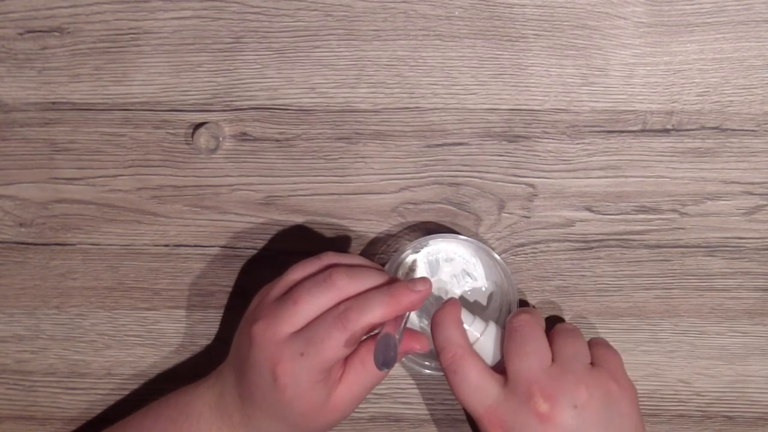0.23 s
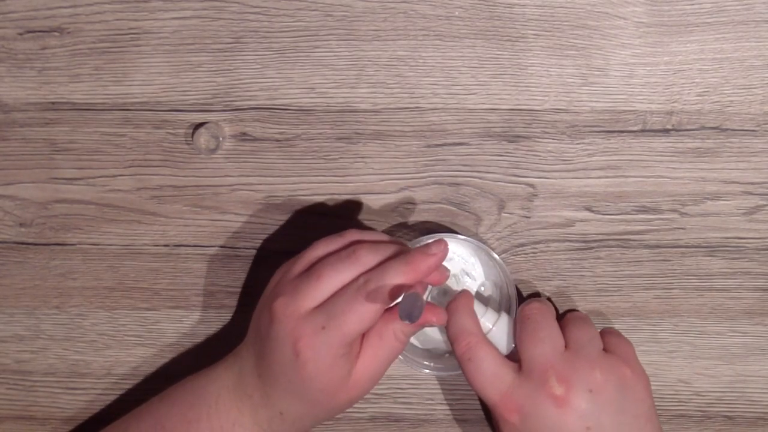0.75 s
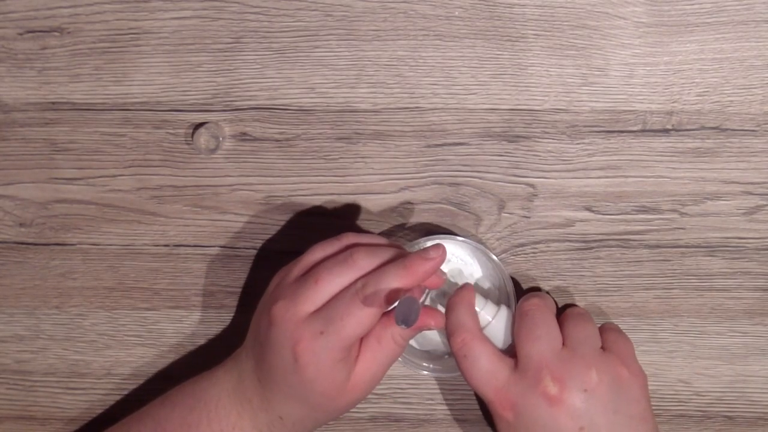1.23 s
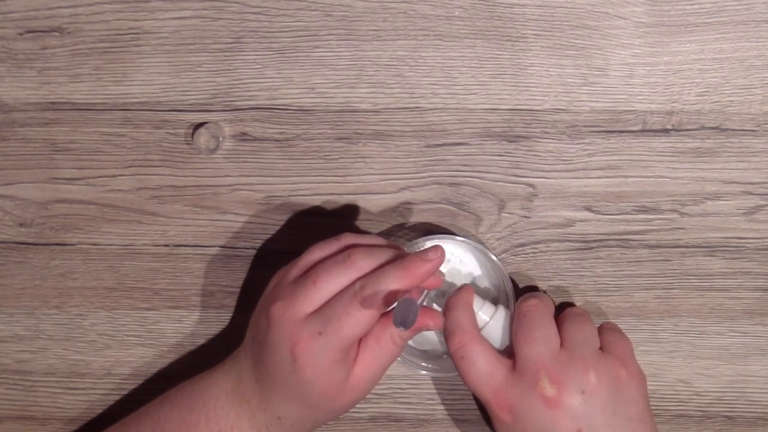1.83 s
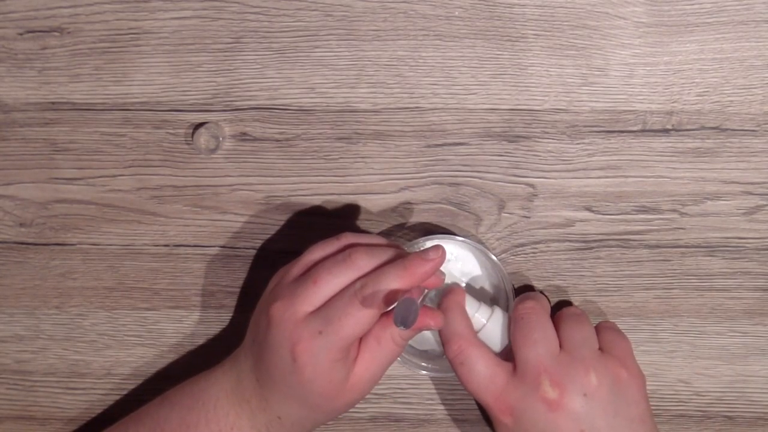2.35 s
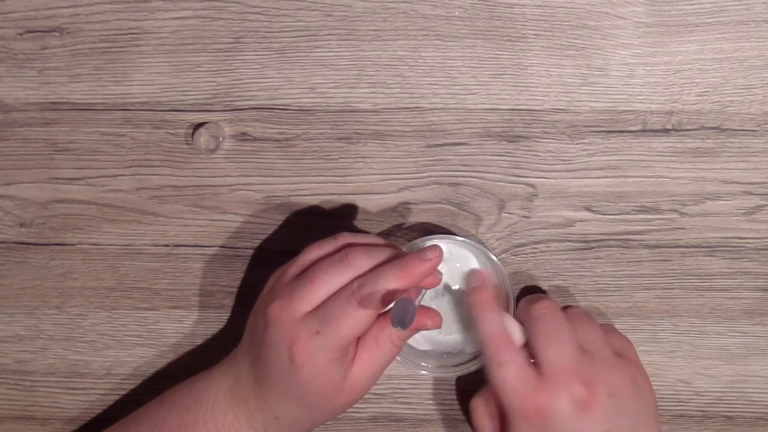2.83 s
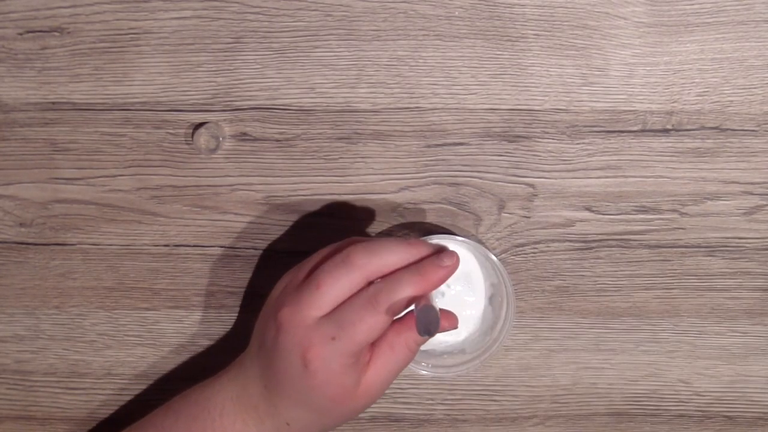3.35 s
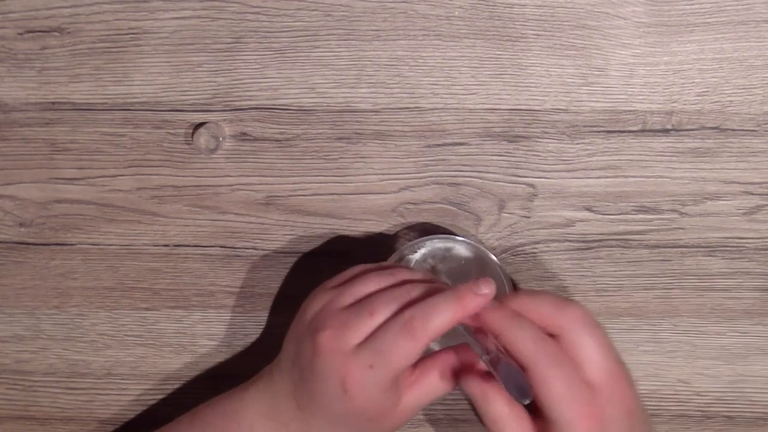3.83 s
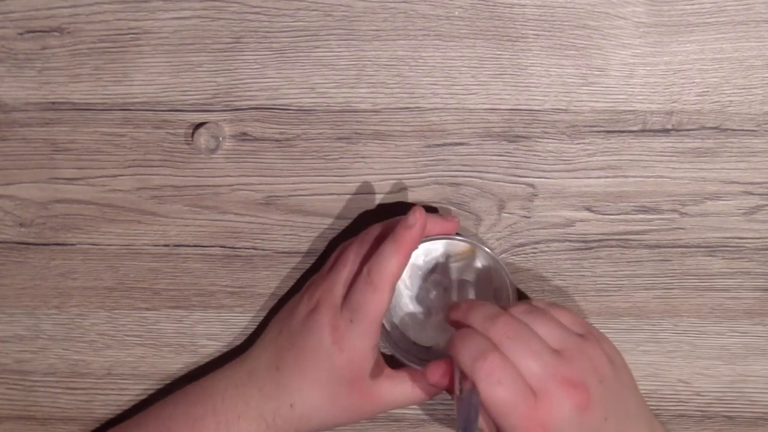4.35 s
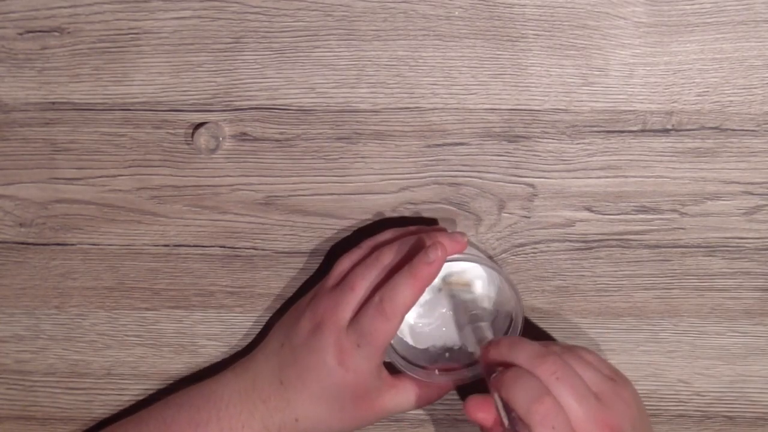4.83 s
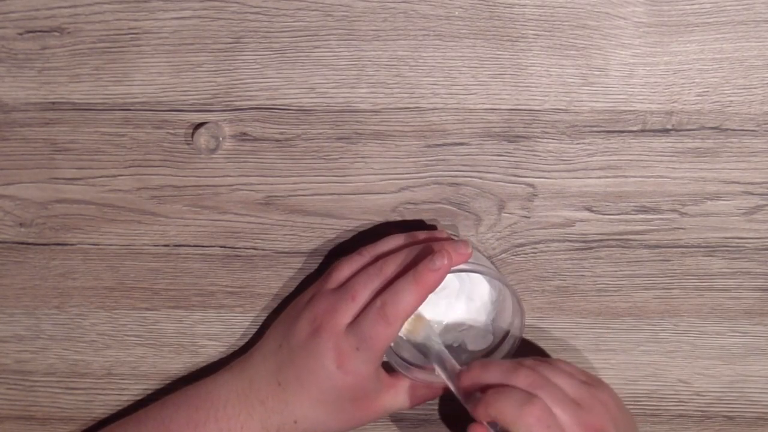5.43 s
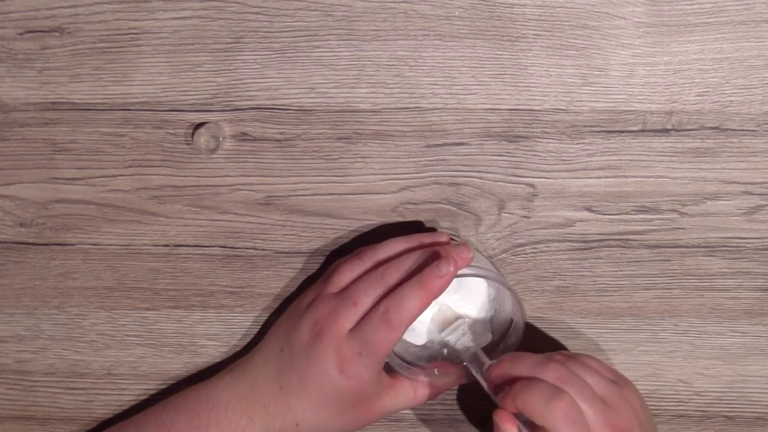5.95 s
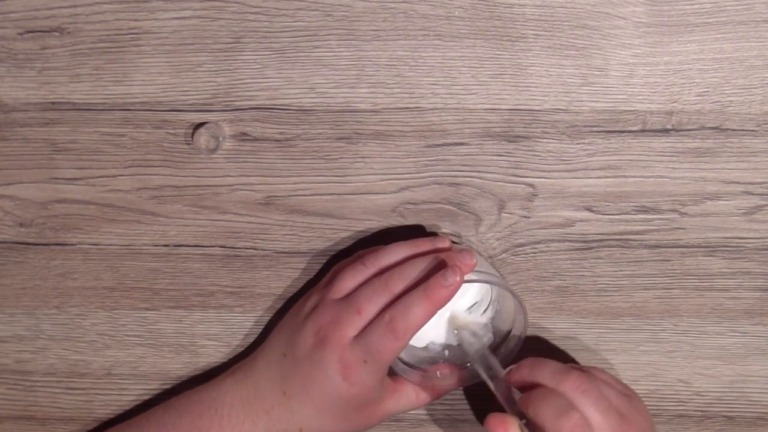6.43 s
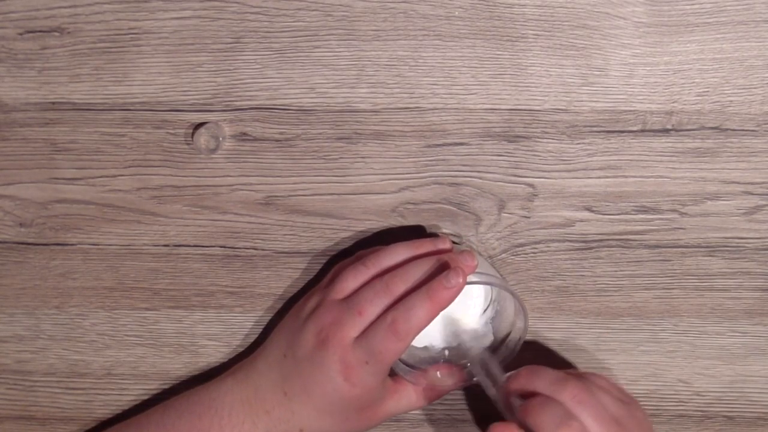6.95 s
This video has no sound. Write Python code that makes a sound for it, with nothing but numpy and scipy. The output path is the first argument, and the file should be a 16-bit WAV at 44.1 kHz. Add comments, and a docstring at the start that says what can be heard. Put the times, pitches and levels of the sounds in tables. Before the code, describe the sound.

Plastic spray pump pressed about five times a second, crisp snaps followed by soft bursts of mist into a cup, with a few light hollow cup bumps. A pause, then one loud wooden thud with a short chatter as the bottle is put down. Quiet, slow scraping and wet smearing follow, with tiny squeaks and one soft cup knock. Close stereo microphone, small indoor room, steady faint hiss and low hum.

```python
"""In a small room, at a wooden table, a small pump bottle sprays water into a plastic cup of paint.
Two presses prime the pump, then each of nine gives a click and a puff of mist; the cup is bumped at times.
The bottle is put down hard and rocks to rest, then a thin tool stirs the paint slowly and quietly.
Solid bodies are sums of decaying modes excited by pulses and noise; mist, paint and the steady background
are coloured noise; stick-slip is a train of random impulses through resonances."""
import sys
import numpy as np
from scipy import signal
from scipy.fft import rfft, irfft
from scipy.io import wavfile

SR = 44100
rng = np.random.default_rng(int(sys.argv[2]) if len(sys.argv) > 2 else 0)


def materialize(psi):
    """Save the field psi as 16-bit PCM at rate SR to the path in sys.argv[1].

    A 1-D psi becomes a single channel; in a 2-D psi each row is a channel.
    """
    bounded = np.clip(np.atleast_2d(psi).T, -1, 1)
    quanta = np.round(bounded * 32767).astype(np.int16)
    wavfile.write(sys.argv[1], SR, quanta)


N = 317079
TIME = np.arange(N) / SR

# All levels in the tables are relative: (..., level [dB]).
# Steady background hiss, power spectrum: (frequency [Hz], density [dB per Hz])
AIR_SPECTRUM = [(12, -27), (20, -4), (32, -1.5), (53, 1.5), (70, -8), (113, -9), (233, -13), (355, -15.5),
                (386, -13.5), (843, -21.5), (916, -22), (1210, -22.5), (1690, -24.5), (3500, -28),
                (15800, -33)]
# Left-right difference of the background hiss: (frequency [Hz], side against mid [dB])
AIR_WIDTH = [(60, -5.5), (130, -1.5), (290, -4), (640, -3), (1410, -2.5), (3100, 0), (6820, 1), (15000, -1)]

# Knocks on the cup: (time [s], level [dB], contact hardness as low-pass cutoff [Hz])
CUP_KNOCKS = [(0.008, -18, 600), (0.6612, -7.5, 3600), (0.6675, -16.5, 2200), (0.697, -17.5, 2000),
              (0.861, -25.5, 1790), (1.092, -24, 1200), (1.176, -17, 2180), (1.328, -31, 1500),
              (2.735, -31, 1500), (4.7115, -16, 1120), (5.3624, -39.5, 2500)]
# Modes of the cup: (frequency [Hz], level [dB], t60 [s])
CUP_MODES = [(65, -56, 0.31), (120, -23, 0.2), (234, -26, 0.15), (349, -35, 0.12), (407, -30, 0.037),
             (706, -22, 0.057), (850, -17.5, 0.063), (1070, -5, 0.022), (1260, -12, 0.06),
             (1360, -4.5, 0.0095), (1490, -5.5, 0.041), (1630, -4.5, 0.011), (2470, -27, 0.044)]
# Contact noise of the cup: (frequency [Hz], density [dB per Hz])
CUP_CRACK = [(60, 7.5), (150, -26), (280, -16), (500, -4.5), (900, -8.5), (1400, 8), (1700, -16),
             (2200, -14.5), (3500, -24.5), (8000, -6.5), (15000, -13)]

# Presses of the pump: (time [s], held down [s], snap level [dB], hollow ring level [dB], hollow pitch [Hz])
PRESSES = [(0.1924, 0.14, -12.5, -34.5, 520), (0.7336, 0.13, -13, -32, 572), (0.961, 0.097, -10, -25, 624),
           (1.1899, 0.088, -11, -27, 598), (1.3987, 0.087, -10, -28, 605), (1.5993, 0.094, -8, -27, 627),
           (1.8105, 0.089, -10, -31, 611), (2.001, 0.086, -10.5, -32.5, 473),
           (2.2024, 0.097, -9.5, -29, 618), (2.3939, 0.091, -7.5, -27.5, 625),
           (2.585, 0.1, -9.5, -24.5, 610)]
# Modes of the plunger: (frequency [Hz], level [dB], t60 [s])
PLUNGER_MODES = [(1685, -19.5, 0.052), (1906, -20, 0.056), (2090, -20.5, 0.14), (2310, -16, 0.04),
                 (2670, -26, 0.014)]
# Noise of the plunger's snap: (frequency [Hz], density [dB per Hz])
SNAP_SPECTRUM = [(100, -26), (280, -8), (480, 10), (800, -3.5), (1200, -3.5), (1750, 2), (2300, -3),
                 (3200, -3), (4200, 0), (5800, -6.5), (7000, 3), (9000, 3), (11200, 6), (13000, -2.5),
                 (15700, 1)]
# The plunger springs back this long after the finger lets go, with a weaker snap and a lower ring
RETURN_S, RETURN_SNAP_DB, RETURN_HOLLOW_DB, RETURN_HZ = 0.033, -25.5, -57, 450

# Noise of the jet: (frequency [Hz], density [dB per Hz])
MIST_SPECTRUM = [(150, -23), (500, -22), (1100, -13), (2000, -8.5), (4200, -5.5), (5900, -9), (7200, -4.5),
                 (9000, -3), (10200, -4.5), (12000, -1), (15700, -4.5)]
# Resonances of the cup's air and the nozzle under the mist: (frequency [Hz], width [Hz], level [dB])
MIST_PEAKS = [(655, 26, -7.5), (1590, 113, 5.5), (8680, 330, 5.5)]
PRIMED_S = 0.95  # earlier presses only draw up water and give no mist
# The mist follows the snap after a lag, longer at first while air is left in the tube
MIST_DB, MIST_LAG_S, AIR_LAG_S, AIR_CLEARS_S = -23, 0.027, 0.011, 0.89

# The bottle lands on the table: (time [s], level [dB], contact hardness as low-pass cutoff [Hz])
LANDING = [(3.4378, -0.5, 2500)]
# Modes of the table: (frequency [Hz], level [dB], t60 [s])
TABLE_MODES = [(65.2, -17.5, 0.67), (93.2, -26.5, 0.84), (127.2, -24.5, 0.7), (146.2, -20.5, 0.49),
               (207.3, -23, 0.46), (247.4, -17, 0.47), (276, -35, 0.22), (316, -13, 0.36), (383, -32, 0.21),
               (400.3, -21.5, 0.45), (421.4, -16.5, 0.4), (477, -28, 0.58), (700, -42, 0.14),
               (779, -17.5, 0.087), (1110, -26, 0.22)]
# Contact noise of the table: (frequency [Hz], density [dB per Hz])
THUD_SPECTRUM = [(30, -35), (70, -10), (130, -9), (190, 2), (270, 5), (430, 3), (590, -16), (780, -8),
                 (950, -22), (1300, -10.5), (1800, -20.5), (5000, -35)]
# The bottle's base chatters as it rocks to rest: (time [s], level [dB])
ROCKING = [(3.4382, -10.5), (3.451, -12.5), (3.4705, -13), (3.4845, -18), (3.505, -20), (3.526, -20),
           (3.553, -25)]
ROCKING_HARDNESS_HZ = 12100
# Modes of the bottle's base: (frequency [Hz], level [dB], t60 [s])
BASE_MODES = [(1170, -17, .06), (1304, -10, 0.088), (1390, -19, 0.078), (2420, -12, 0.017),
              (2710, -12.5, 0.02), (2980, -18, 0.034), (3106, -21.5, 0.038)]
# Contact noise of the base: (frequency [Hz], density [dB per Hz])
BASE_CRACK = [(200, -12), (700, 11.5), (1300, 4.5), (1900, 0.5), (2900, -8.5), (4200, -7.5), (5500, -17),
              (9000, -14.5), (15000, -23)]

# Strokes of the stirring tool: (start [s], end [s], smearing hiss level [dB], rub on the cup level [dB])
STROKES = [(3.88, 4.12, -61.5, -72), (4.18, 4.252, -52, -49), (4.27, 4.547, -54, -59),
           (4.573, 4.616, -53, -50), (4.683, 4.975, -54, -53.5), (5.016, 5.138, -55.5, -53.5),
           (5.154, 5.252, -52.5, -51.5), (5.353, 5.51, -54.5, -66), (5.647, 5.738, -52.5, -54),
           (5.865, 6.016, -56, -54), (6.112, 6.2, -52, -51), (6.283, 6.505, -54, -54),
           (6.732, 6.873, -55.5, -50.5), (6.935, 7.03, -60, -65), (7.067, 7.173, -52.5, -54)]
STROKE_ATTACK_S, HISS_RELEASE_S, RUB_RELEASE_S = 0.014, 0.035, 0.049
# Over a stroke paint heaps up ahead of the tool: the hiss grows and the tip is cushioned
HISS_SWELL_DB, RUB_FADE_DB = 6, 2.5
# Resonances of the scraped cup: (frequency [Hz], width [Hz], level [dB])
SCRAPE_PEAKS = [(670, 91, -16), (1310, 53, 6.5), (1463, 84, 0.5), (1940, 190, -11.5), (3200, 170, -11.5)]
# Noise of smeared paint: (frequency [Hz], density [dB per Hz])
SMEAR_SPECTRUM = [(300, -4), (1000, -13), (2000, -7.5), (3400, 0.5), (5800, -3.5), (9000, 4), (12000, -0.5),
                  (15700, -3.5)]
# Level of a faint, thin whistle: (time [s], level [dB])
WHISTLE_LEVEL = [(3.88, -62), (4.04, -57), (4.075, -48), (4.14, -51), (4.17, -70)]
WHISTLE_FROM_HZ, WHISTLE_TOP_HZ, WHISTLE_GLIDE_S = 11000, 15680, 0.062
# Short squeaks and sticky ticks of the tool: (time [s], length [s], frequency [Hz], width [Hz], level [dB])
SQUEAKS = [(3.935, 0.025, 2970, 1800, -51), (4.19, 0.05, 1650, 400, -49), (4.242, 0.27, 1780, 250, -54.5),
           (4.892, 0.059, 3100, 1400, -51.5), (6.239, 0.071, 630, 50, -51), (6.716, 0.1, 3350, 800, -55),
           (6.802, 0.037, 1320, 250, -48)]

# Decay of the room: (frequency [Hz], t60 [s])
ROOM_T60 = [(100, 0.37), (500, 0.61), (1500, 0.36), (5000, 0.41), (9000, 0.23), (15000, 0.12)]
# Left-right difference of the close sounds: (frequency [Hz], side against mid [dB])
WIDTH = [(60, 2), (99, -14), (160, -22), (270, -38), (450, -27), (740, -27), (1220, -18), (2010, -70),
         (3330, -74), (5500, -23), (9080, -19.5), (15000, -6.5)]
CUTOFF_HZ = 15820


def from_db(db):
    """Level to amplitude: twenty decibels are a factor of ten."""
    return 10 ** (np.asarray(db) / 20)


def rms_one(x):
    """Normalization: scale to a root mean square of one."""
    return x / np.sqrt(np.mean(x ** 2) + 1e-20)


def at_hz(points, hz):
    """Interpolation of a table along a logarithmic frequency axis."""
    f, value = np.transpose(points)
    return np.interp(np.log(np.maximum(hz, 1)), np.log(f), value)


def through(x, response):
    """Linear filtering: convolve with an impulse response, keeping the scene's length."""
    return signal.oaconvolve(x, response)[:N]


def response_of(spectrum, size=8192):
    """Minimum phase: folding the cepstrum gives the causal impulse response with this spectrum."""
    hz = np.fft.rfftfreq(size, 1 / SR)
    cepstrum = irfft(np.log(from_db(at_hz(spectrum, hz))))
    cepstrum[1:size // 2] *= 2
    cepstrum[size // 2 + 1:] = 0
    return irfft(np.exp(rfft(cepstrum)))


def coloured(x, spectrum):
    """Spectral shaping with a filter of unit energy, so white noise keeps its power."""
    response = response_of(spectrum)
    return through(x, response / np.linalg.norm(response))


def soften(x, hz, order=2):
    """Low-pass filtering: fast changes above the cutoff are smoothed away."""
    low_pass = signal.butter(order, min(hz, .45 * SR), fs=SR, output="sos")
    return signal.sosfilt(low_pass, x + 1e-18)


def resonate(x, peaks):
    """Resonance: parallel two-pole filters, each with a pole radius set by its bandwidth."""
    out = 0
    for hz, width, db in peaks:
        r = np.exp(-np.pi * width / SR)
        poles = [1, -2 * r * np.cos(2 * np.pi * hz / SR), r * r]
        gain = from_db(db) * (1 - r * r) / 2
        out = out + gain * signal.lfilter([1, 0, -1], poles, x + 1e-18)
    return out


def dying(t60):
    """Exponential decay over one second of samples, falling 60 dB in each t60."""
    return from_db(-60 * TIME[:SR] / t60)


def struck(modes, vary_db):
    """Modal superposition: a blow excites each mode by a random amount, neighbours in opposite phase."""
    out = 0
    for k, (hz, db, t60) in enumerate(modes):
        strength = from_db(db + vary_db * rng.standard_normal())
        out = out + (-1) ** k * strength * dying(t60) * np.sin(2 * np.pi * hz * TIME[:SR])
    return out


def burst(crack_t60, tail_db, tail_t60):
    """Two-stage decay of noise: a sharp crack and the dense ringing that follows it."""
    return rng.standard_normal(SR) * (dying(crack_t60) + from_db(tail_db) * dying(tail_t60))


def add(out, s, sound):
    """Superposition: mix a sound in at a time in seconds."""
    start = round(s * SR)
    out[start:start + len(sound)] += sound[:N - start]


def background(hum_hz=50.9, hum_db=-51.5, rumble_width_hz=22, rumble_db=-57.0, air_db=-47.5, side_db=-2.5):
    """Partial correlation: hiss shared and opposed between the sides, over a low hum with rumble around it."""
    peak = [(hum_hz, rumble_width_hz, 0)]
    # an extra second lets the resonance build up first
    rumble = resonate(resonate(rng.standard_normal(N + SR), peak), peak)[SR:]
    rumble = from_db(rumble_db) * rms_one(rumble)
    hum = from_db(hum_db) * rms_one(np.sin(2 * np.pi * hum_hz * TIME))
    mid = coloured(rng.standard_normal(N), AIR_SPECTRUM)
    side = through(coloured(rng.standard_normal(N), AIR_SPECTRUM), response_of(AIR_WIDTH))
    side = from_db(side_db) * side
    return from_db(air_db) * np.array([mid + side, mid - side]) + hum + rumble


def knocks(rows, modes, crack, pulse_db, crack_db, crack_t60, tail_db, tail_t60, vary_db):
    """Impact: a pressure pulse, a crack and the body's modes, all duller when the contact is soft."""
    out = np.zeros(N)
    pulse = from_db(pulse_db) * signal.unit_impulse(SR)
    for s, db, hardness_hz in rows:
        noise = from_db(crack_db) * burst(crack_t60, tail_db, tail_t60)
        contact = coloured(pulse + noise, crack)[:SR]
        blow = struck(modes, vary_db) + contact
        add(out, s, from_db(db) * soften(blow, hardness_hz, order=3))
    return out


def pump(bounce_s=0.0051, bounce_db=-6, press_db=-6, ring_db=7, hollow_t60=0.06, swell_s=0.0052):
    """Impact, reflection and cavity resonance: snaps echo off the table, the hollow bottle swells and rings."""
    snaps, rings, t = np.zeros(N), np.zeros(N), TIME[:SR]
    downs = [(s, snap_db, hollow_db, hz) for s, _, snap_db, hollow_db, hz in PRESSES]
    ups = [(s + held_s + RETURN_S, RETURN_SNAP_DB, RETURN_HOLLOW_DB, RETURN_HZ) for s, held_s, *_ in PRESSES]
    for s, snap_db, hollow_db, hollow_hz in downs + ups:
        force = from_db(snap_db + press_db)
        snap = force * burst(crack_t60=0.005, tail_db=-5, tail_t60=0.073)
        add(snaps, s, snap)
        add(snaps, s + bounce_s, from_db(bounce_db) * snap)
        add(rings, s, force * struck(PLUNGER_MODES, vary_db=3.0))
        hollow = (1 - np.exp(-t / swell_s)) * dying(hollow_t60) * np.sin(2 * np.pi * hollow_hz * t)
        add(rings, s, from_db(hollow_db + ring_db) * hollow)
    return coloured(snaps, SNAP_SPECTRUM) + rings


def mist(open_s=0.0067, close_t60=0.07, sag_db=1.5, cup_db=0.0, sputter_db=0.9):
    """Turbulence: flow through the nozzle modulates noise while the plunger travels, then dribbles shut."""
    flow = np.zeros(N)
    for s, held_s, *_ in PRESSES:
        if s < PRIMED_S:
            continue
        start = s + MIST_LAG_S + AIR_LAG_S * np.exp((PRIMED_S - s) / AIR_CLEARS_S)
        end = s + held_s
        travel = np.clip((TIME - start) / (end - start), 0, 1)
        opening = np.clip((TIME - start) / open_s + .5, 0, 1)
        closing = from_db(-60 * np.clip(TIME - end, 0, 1) / close_t60)
        # strongest in mid-travel
        flow += from_db(MIST_DB - sag_db * (2 * travel - 1) ** 2) * opening * closing
    # the jet breaks up unevenly
    flow = flow * from_db(sputter_db * rms_one(soften(rng.standard_normal(N), 250)))
    jet = flow * rng.standard_normal(N)
    swirl = flow * rng.standard_normal(N)
    return coloured(jet, MIST_SPECTRUM) + from_db(cup_db) * resonate(swirl, MIST_PEAKS)


def stroke_levels():
    """Changing load: gains of hiss and rub as each stroke sets in on the cup and ends pushing paint."""
    smear, rub = np.zeros(N), np.zeros(N)
    for start, end, hiss_db, rub_db in STROKES:
        travel = np.clip((TIME - start) / (end - start), 0, 1) - .5
        touching = np.clip((TIME - start) / STROKE_ATTACK_S + .5, 0, 1)
        hiss_release = np.clip((end - TIME) / HISS_RELEASE_S + .5, 0, 1)
        rub_release = np.clip((end - TIME) / RUB_RELEASE_S + 1, 0, 1)
        smear += touching * hiss_release * from_db(hiss_db + HISS_SWELL_DB * travel)
        rub += touching * rub_release * from_db(rub_db - RUB_FADE_DB * travel)
    return smear, rub


def stirring(slips_per_s=350, slip_spread_db=2.0, hiss_db=-1.0, rub_db=-2.0, unsteady_db=0.96, unsteady_hz=18):
    """Stick-slip friction: tiny random slips ring the cup, wet paint hisses, the hand presses unevenly."""
    smear_gain, rub_gain = stroke_levels()
    pressure = from_db(unsteady_db * rms_one(soften(rng.standard_normal(N), unsteady_hz)))
    sizes = from_db(slip_spread_db * np.minimum(rng.exponential(1, N), 4)) * rng.choice([-1, 1], N)
    slips = sizes * (rng.random(N) < slips_per_s / SR)
    rub = from_db(rub_db) * rub_gain * rms_one(resonate(slips, SCRAPE_PEAKS))
    paint = coloured(rng.standard_normal(N) + 0.7 * rms_one(slips), SMEAR_SPECTRUM)
    hiss = from_db(hiss_db) * smear_gain * paint
    return pressure * (rub + hiss)


def whistle(waver_hz=110):
    """Frequency modulation: a very high tone glides up, wavers about its top pitch and stops."""
    s, db = np.transpose(WHISTLE_LEVEL)
    sounding = (TIME > s[0]) * (TIME < s[-1])
    glide = np.exp(-np.maximum(TIME - s[0], 0) / WHISTLE_GLIDE_S)
    hz = WHISTLE_TOP_HZ - (WHISTLE_TOP_HZ - WHISTLE_FROM_HZ) * glide
    hz = hz + waver_hz * rms_one(soften(rng.standard_normal(N), 58))
    return sounding * from_db(np.interp(TIME, s, db)) * np.sin(2 * np.pi * np.cumsum(hz) / SR)


def squeaks():
    """Frictional excitation: the tool catches for a moment and noise sets one resonance going."""
    out = np.zeros(N)
    for s, length_s, hz, width, db in SQUEAKS:
        swell = np.sqrt(np.hanning(round(length_s * SR)))
        tone = resonate(resonate(rng.standard_normal(SR), [(hz, width, 0)]), [(hz, 2 * width, 0)])
        add(out, s, from_db(db) * swell * rms_one(tone[-len(swell):]))
    return out


def room(x, wet_db):
    """Reverberation: a diffuse tail of noise bands, each with its own decay, the highest dying soonest."""
    edges, tail = np.geomspace(40, 17000, num=14), 0
    white = rfft(rng.standard_normal(SR))
    hz = np.fft.rfftfreq(SR, 1 / SR)
    for low, high in zip(edges, edges[1:]):
        band = irfft(white * (hz >= low) * (hz < high), SR)
        tail = tail + band * dying(at_hz(ROOM_T60, np.sqrt(low * high)))
    tail = tail * np.clip((TIME[:SR] - .004) / 0.0025, 0, 1)   # reflections take a moment to build up
    return x + from_db(wet_db) * through(x, tail / np.linalg.norm(tail))


def stereo(x):
    """Scattering: nearby surfaces send each side a little difference, less of it in long waves."""
    scatter = rng.standard_normal(SR) * dying(0.13) * (TIME[:SR] > .002)
    high_pass = signal.butter(2, 130, "high", fs=SR, output="sos")
    scatter = signal.sosfilt(high_pass, scatter / np.linalg.norm(scatter))
    side = through(x, through(scatter, response_of(WIDTH)))
    return np.array([x + side, x - side])


def scene():
    """Superposition of the background with spraying, putting down and stirring, all heard close by."""
    cup = knocks(CUP_KNOCKS, CUP_MODES, CUP_CRACK, pulse_db=-2.0, crack_db=-15.0, crack_t60=0.031,
                 tail_db=9.5, tail_t60=0.065, vary_db=3.0)
    table = knocks(LANDING, TABLE_MODES, THUD_SPECTRUM, pulse_db=2, crack_db=-19.0, crack_t60=0.013,
                   tail_db=2, tail_t60=0.53, vary_db=1.5)
    rocks = [(s, db, ROCKING_HARDNESS_HZ) for s, db in ROCKING]
    base = knocks(rocks, BASE_MODES, BASE_CRACK, pulse_db=5, crack_db=-11.5, crack_t60=0.019,
                  tail_db=-4.5, tail_t60=0.17, vary_db=2.5)
    spraying = room(pump() + mist(), wet_db=-11.0)
    handling = room(cup + base, wet_db=-7.5) + table   # the table's boom outlasts the room's own tail
    tool = stirring() + squeaks()
    return background() + stereo(spraying + handling + tool + whistle())


def record(dry, left_db=-0.16, bass_cut_hz=38):
    """Band limiting: the deepest bass is dropped, the top cut steeply, and the right favoured a little."""
    high_pass = signal.butter(4, bass_cut_hz, "high", fs=SR, output="sos")
    heard = signal.sosfilt(high_pass, dry) * from_db([[left_db], [-left_db]])
    top_cut = signal.ellip(12, .1, 80, CUTOFF_HZ, fs=SR, output="sos")
    return signal.sosfilt(top_cut, heard)


dry = scene()
out = record(dry)
materialize(out)
```